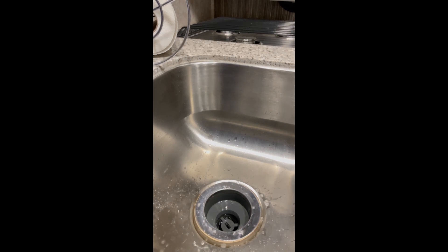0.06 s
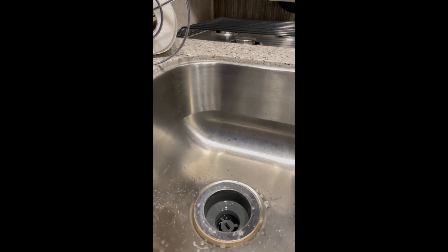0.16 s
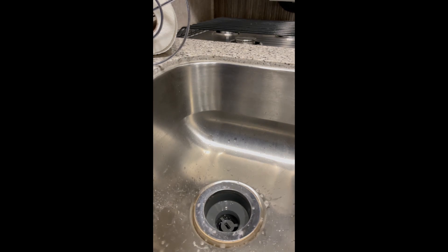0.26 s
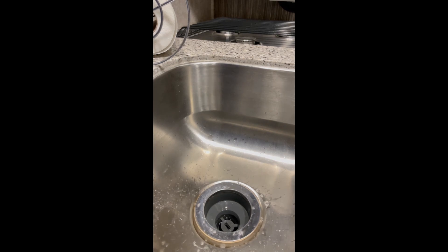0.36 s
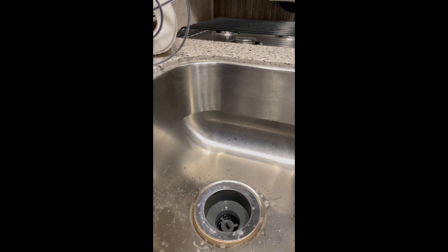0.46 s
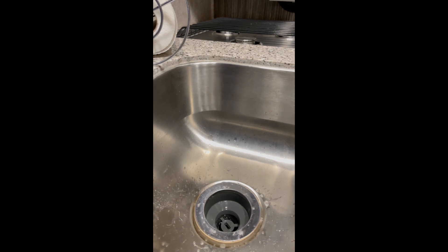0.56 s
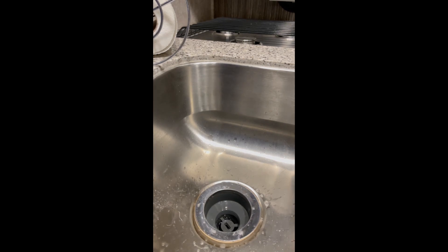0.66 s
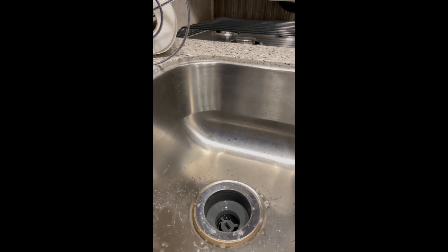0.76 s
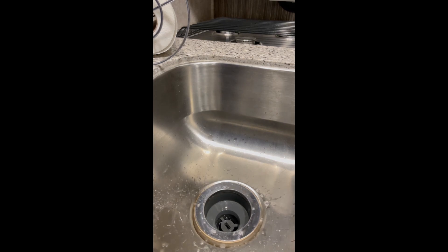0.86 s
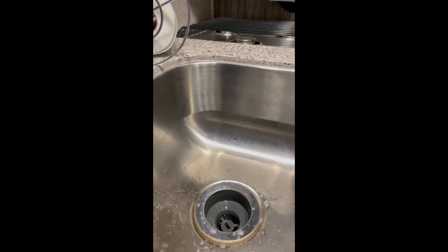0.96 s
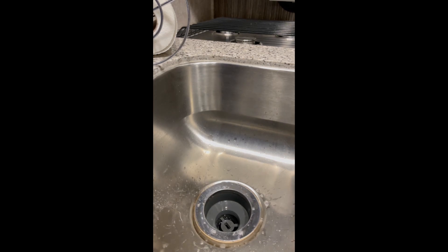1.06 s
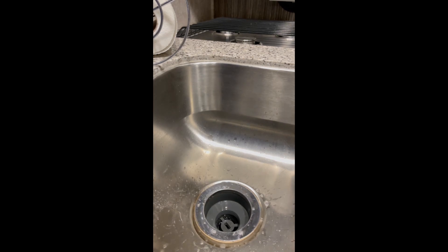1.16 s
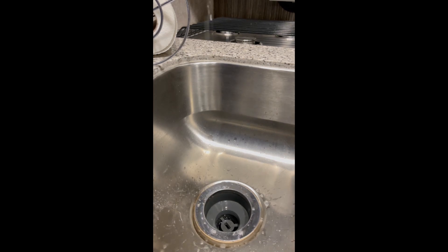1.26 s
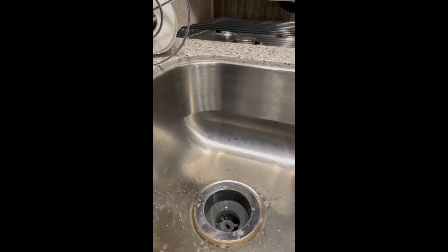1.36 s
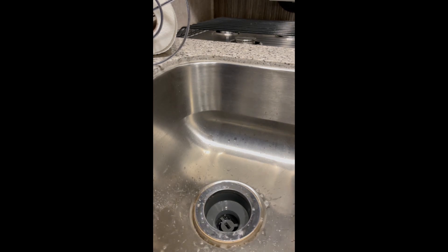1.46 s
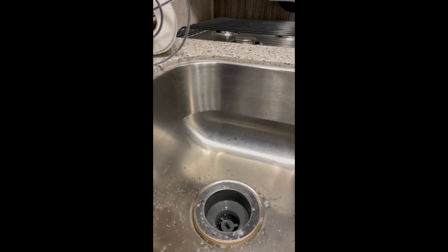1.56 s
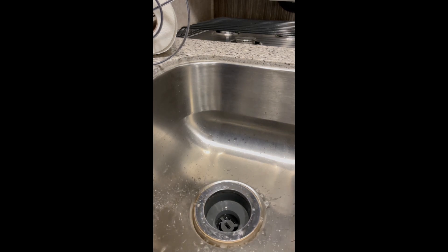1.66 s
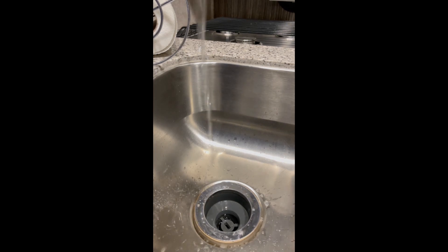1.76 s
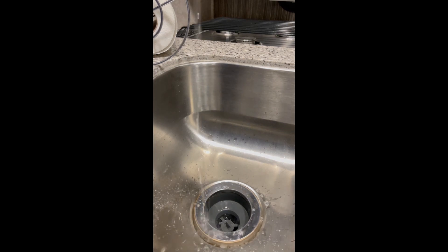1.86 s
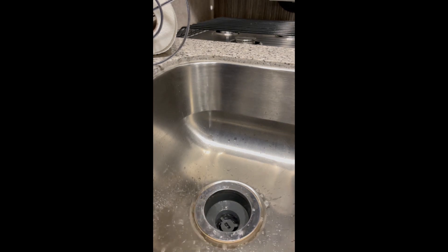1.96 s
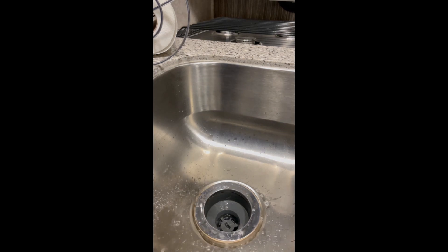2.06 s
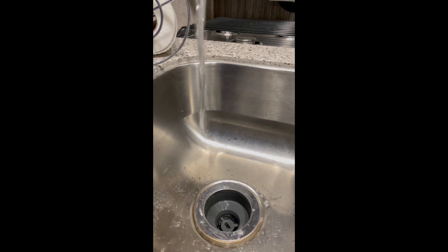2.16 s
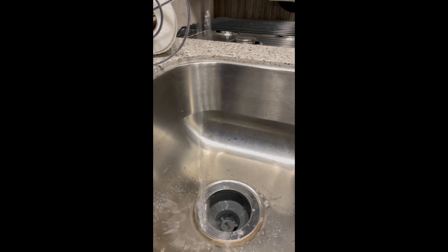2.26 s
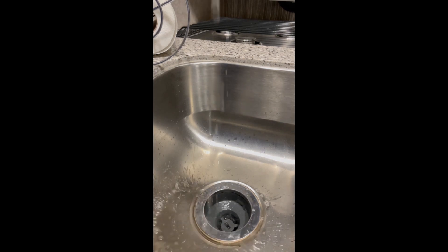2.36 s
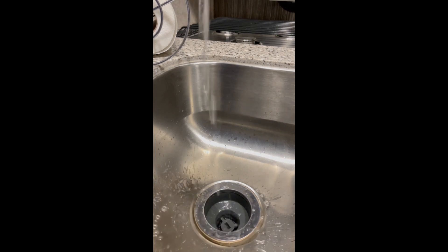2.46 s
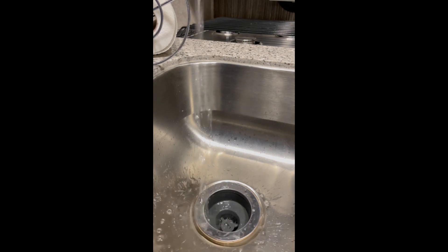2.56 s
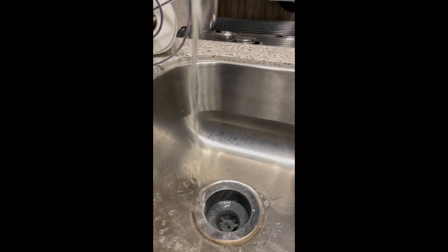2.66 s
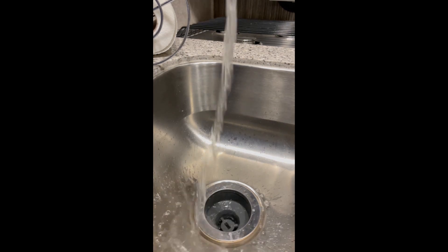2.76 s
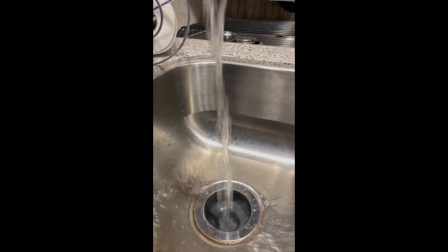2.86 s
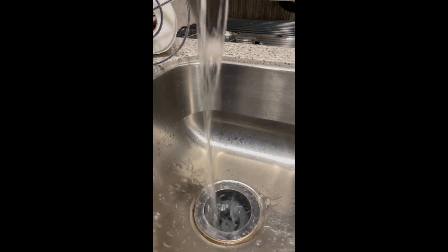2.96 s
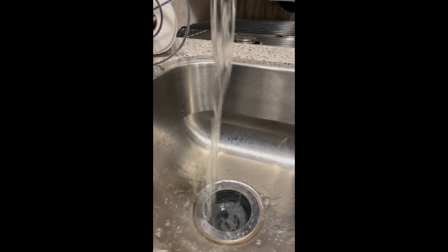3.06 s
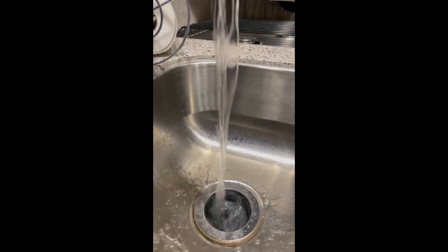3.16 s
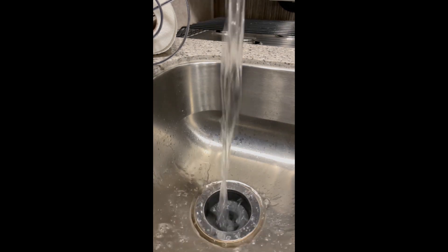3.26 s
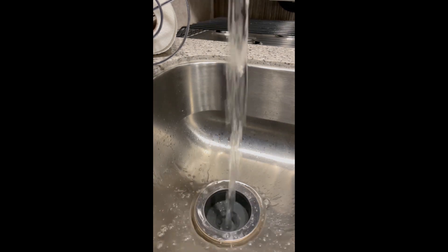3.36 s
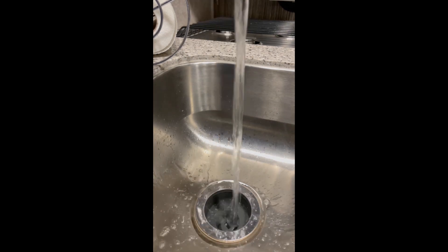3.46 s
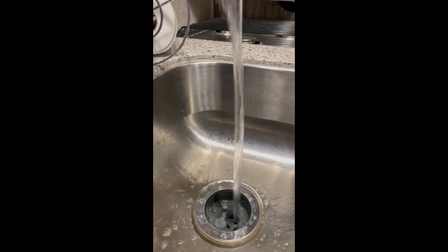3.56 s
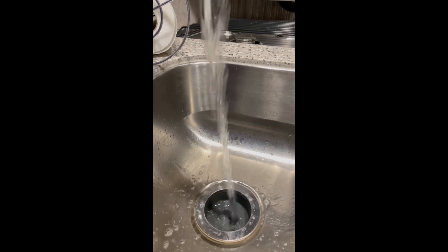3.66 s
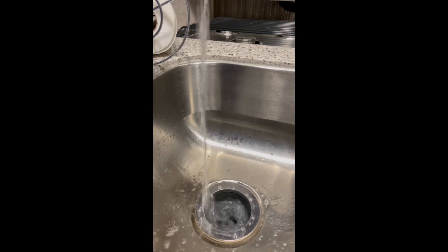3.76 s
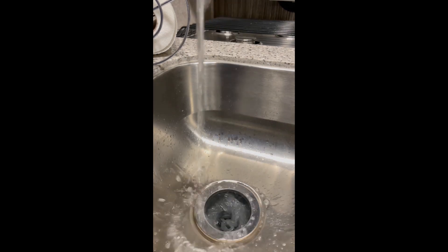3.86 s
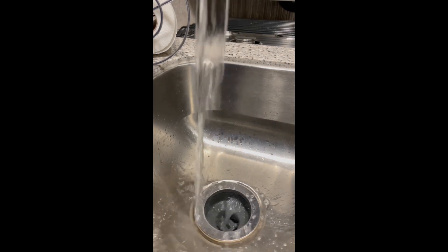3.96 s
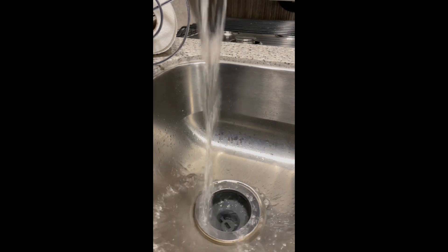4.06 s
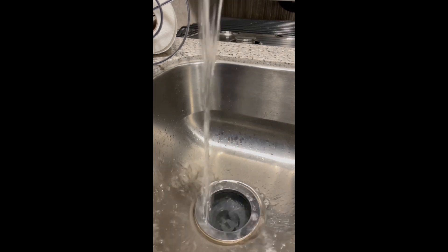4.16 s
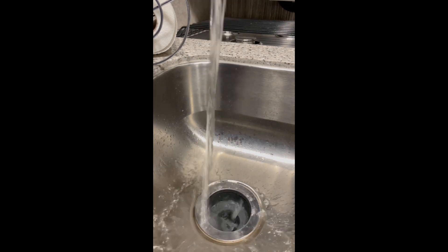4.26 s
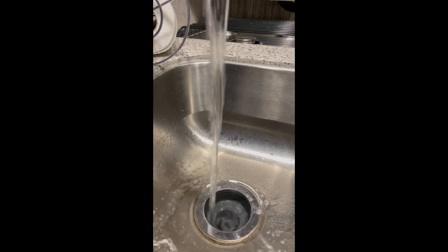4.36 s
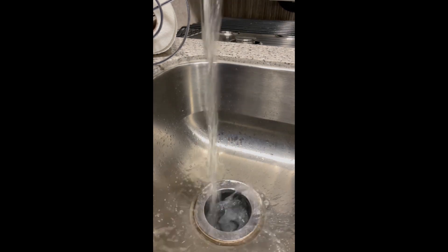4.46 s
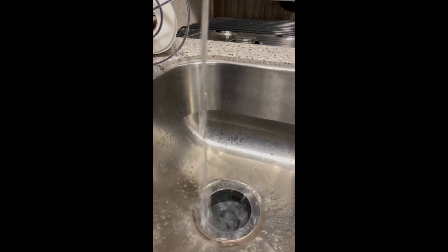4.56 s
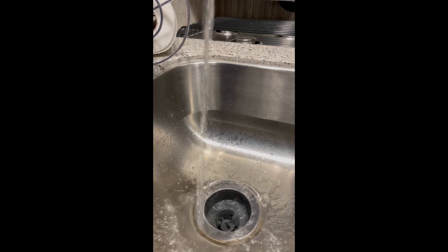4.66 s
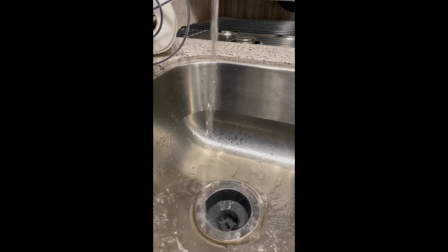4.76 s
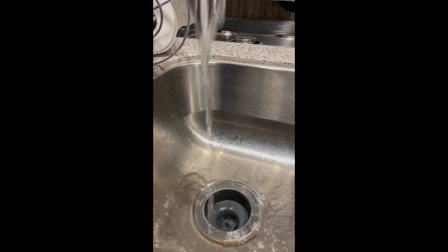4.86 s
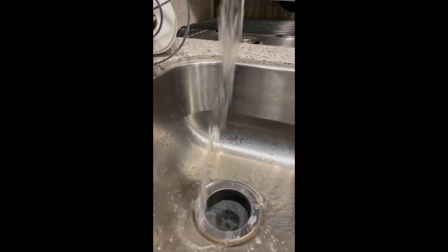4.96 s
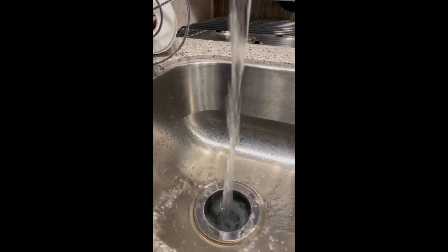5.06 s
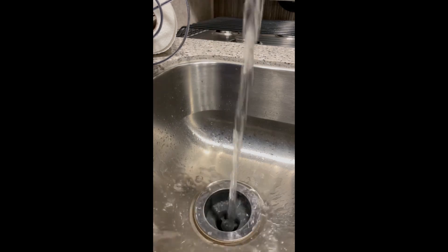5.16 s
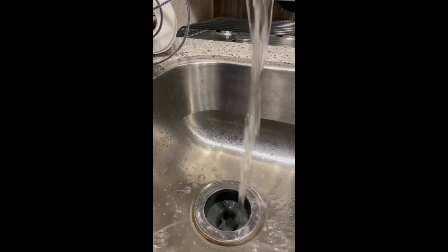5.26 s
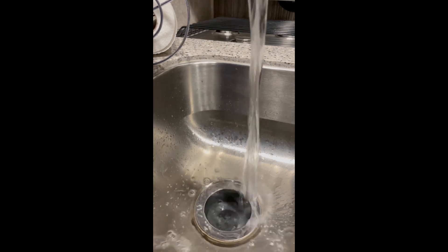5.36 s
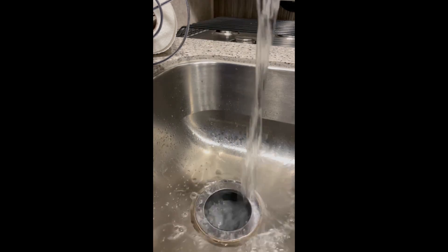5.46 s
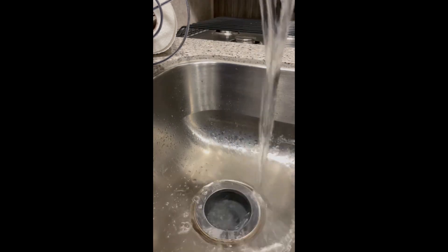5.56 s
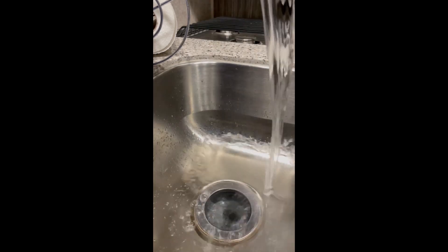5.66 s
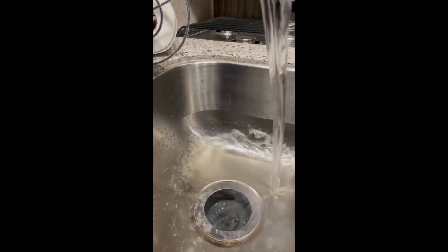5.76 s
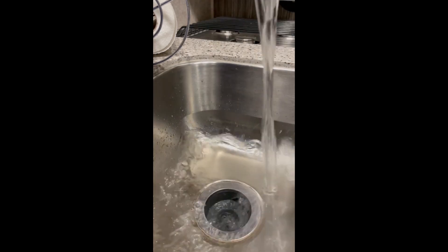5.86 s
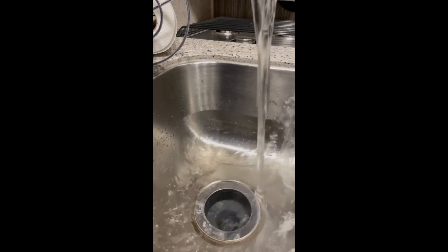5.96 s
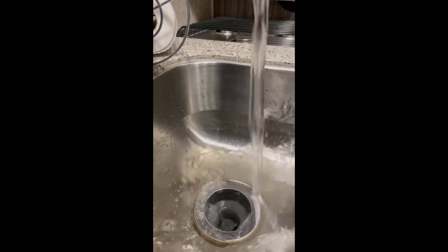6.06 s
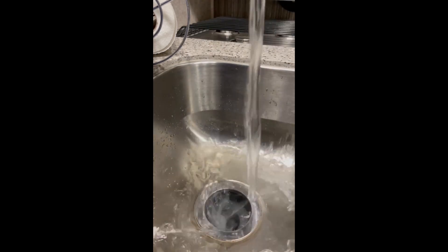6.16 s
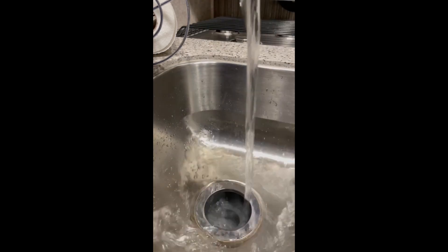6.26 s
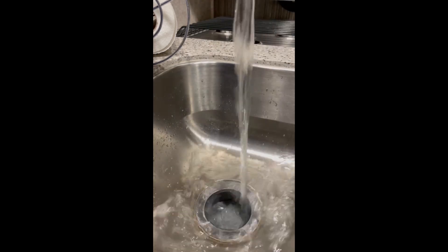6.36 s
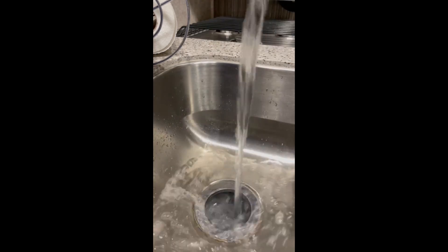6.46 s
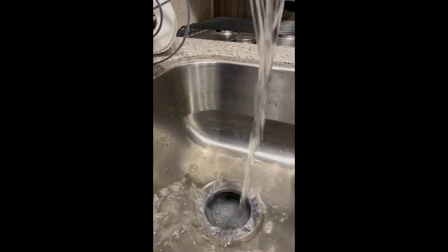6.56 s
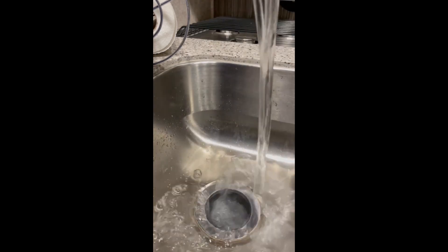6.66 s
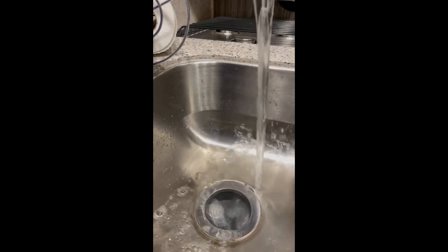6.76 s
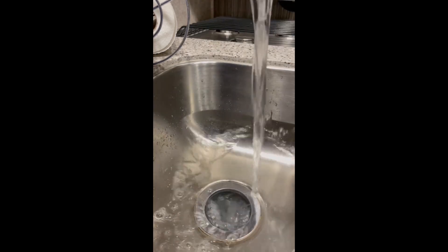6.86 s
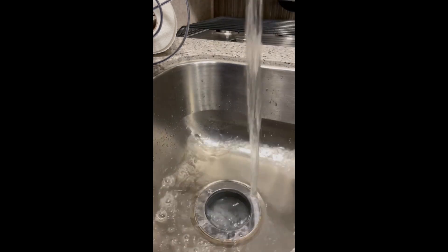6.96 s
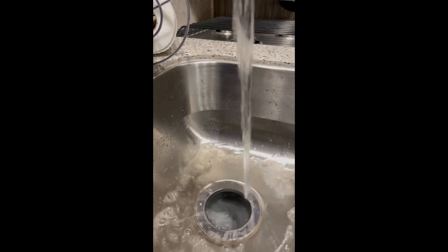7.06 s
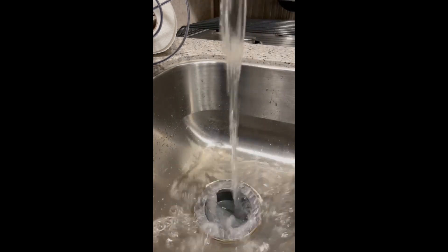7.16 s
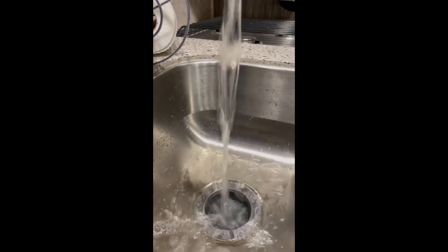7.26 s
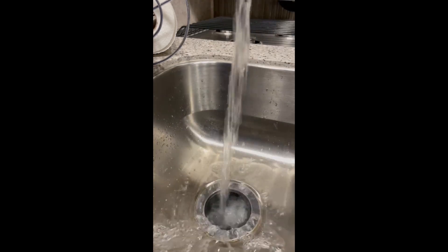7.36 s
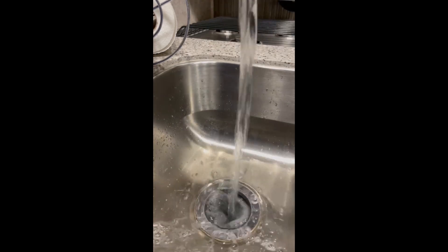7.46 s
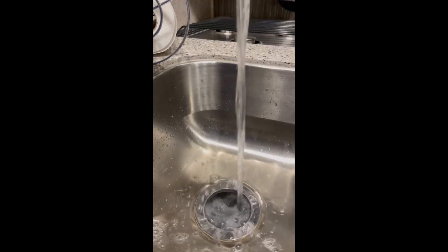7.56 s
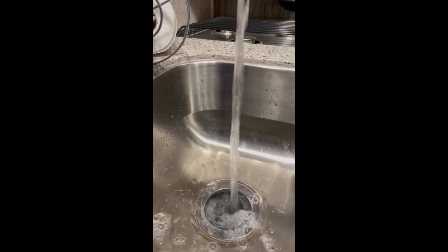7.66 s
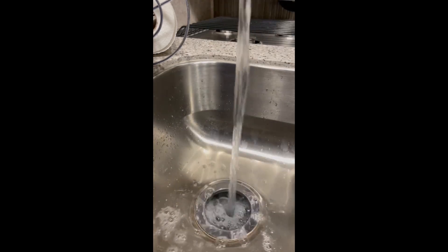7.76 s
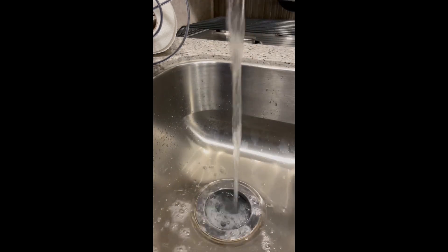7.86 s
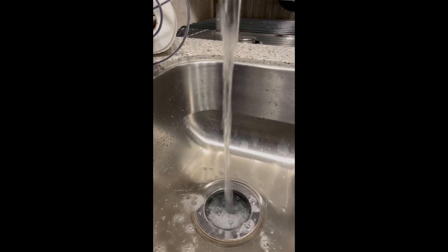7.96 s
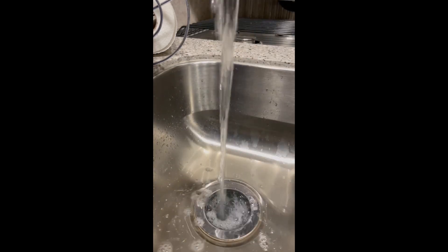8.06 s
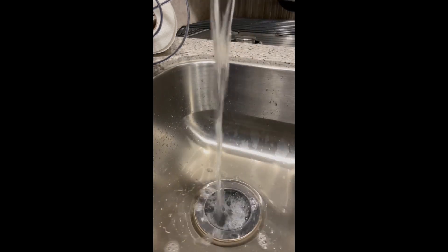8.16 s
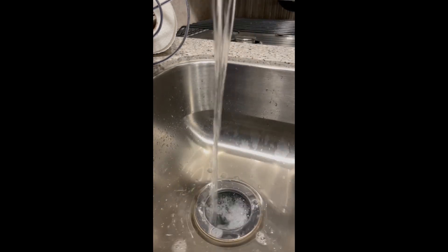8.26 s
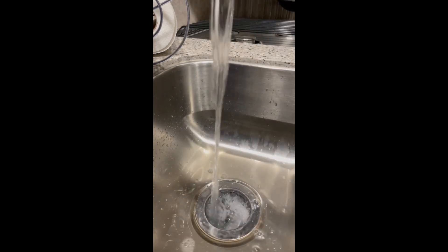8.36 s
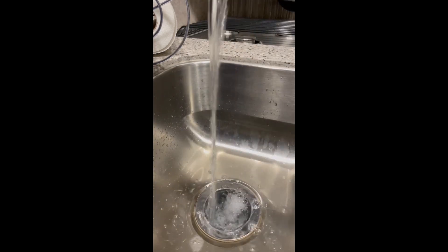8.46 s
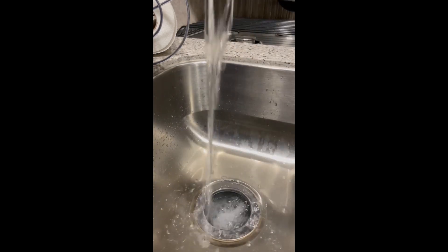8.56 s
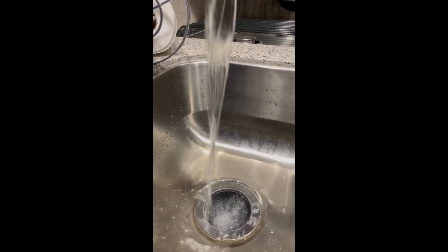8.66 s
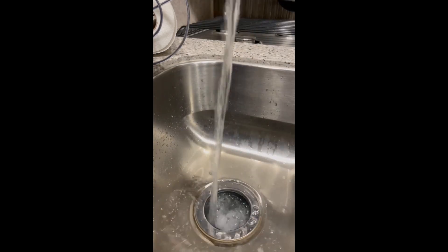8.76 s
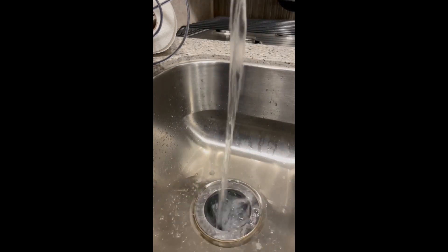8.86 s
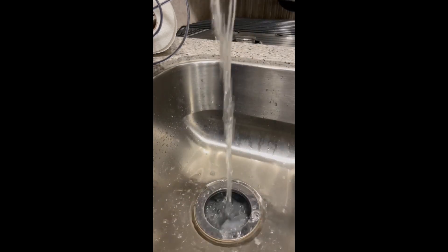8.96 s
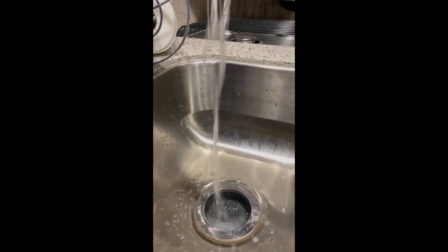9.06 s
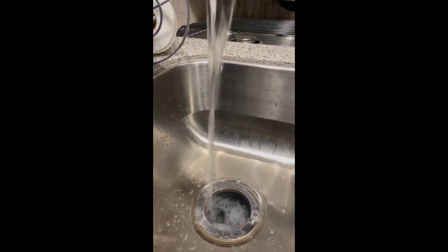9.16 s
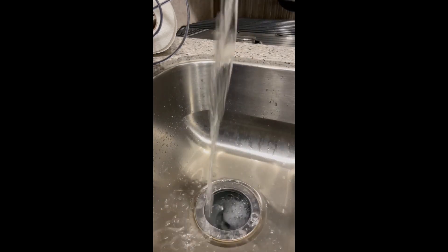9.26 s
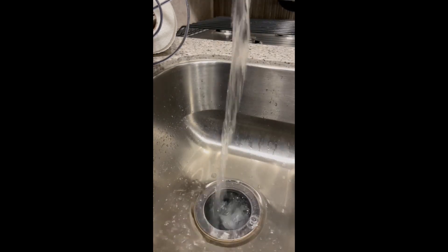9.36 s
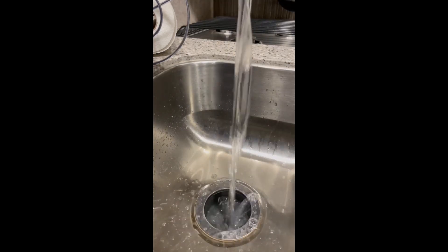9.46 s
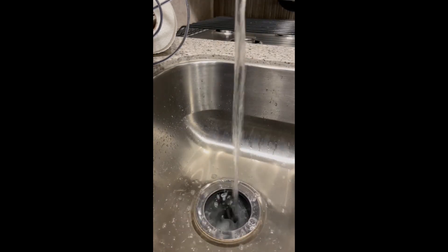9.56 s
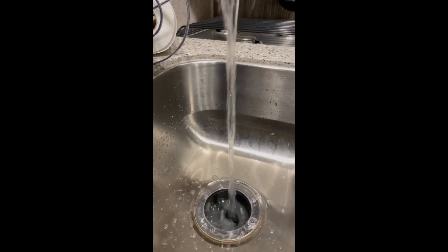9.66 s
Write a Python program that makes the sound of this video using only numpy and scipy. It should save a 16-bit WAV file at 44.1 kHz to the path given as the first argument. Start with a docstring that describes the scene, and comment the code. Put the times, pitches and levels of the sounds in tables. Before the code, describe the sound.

Water poured from a jug lands in a steel kitchen sink, first as separate splats, then as a wandering stream with a low hollow drumming and fizzy splashing. Bubbles and plops build up in the drain while the pour continues. Just before the water, two muffled wooden knocks are heard. The microphone is close above the basin, with a very faint fridge hum behind.

```python
"""Water pours from a jug into a steel kitchen sink: first spills, then a wandering stream.
The stream breaks into lumps whose impacts drive the modes of the bowl and throw spray. Trapped air
resonates as bubbles, which burble at the drain and glug in its pipe. Before the pour, two dull knocks
and a faint third ring a wooden cupboard. A phone with two spaced microphone ports listens from
above, over room tone and a faint fridge hum."""
import sys
import numpy as np
from scipy import signal
from scipy.fft import rfft, irfft, next_fast_len
from scipy.io import wavfile
from scipy.ndimage import uniform_filter1d, map_coordinates

SR = 44100
rng = np.random.default_rng(int(sys.argv[2]) if len(sys.argv) > 2 else 0)


def waveform_to_disk(signal):
    """Save audio, clipped to [-1, 1], as 16-bit WAV at the path in sys.argv[1]."""
    frames = np.transpose(np.atleast_2d(signal))
    scaled = np.clip(frames, -1, 1) * 32767
    samples = np.round(scaled).astype(np.int16)
    wavfile.write(sys.argv[1], SR, samples)


N = 428211


def stream():
    """Impact excitation: landing lumps drum the bowl, throw spray and trap air that resonates."""
    # Colour as the stream moves and the bowl fills: t/s, gurgle offset/dB, mist offset/dB,
    # pipe level/dB, then centre f/Hz of drum, froth and spray
    filling = [(1.4, 5.5, 3, -78, 175, 1900, 2300), (1.95, 0, 7.5, -60, 180.6, 1990, 2300),
               (2.3, 1, 6.5, -51, 180, 1510, 5500), (2.6, 4, -3.5, -42.5, 179, 1490, 5850),
               (3.0, 0.5, 1.5, -40, 160, 1240, 5000), (3.45, 6.5, 4.5, -47, 210, 1220, 3700),
               (3.62, 4.5, 3, -40, 199, 1650, 2860), (3.8, -2.5, 0, -35, 181, 1350, 4100),
               (4.1, 2, 6, -43.5, 167, 1460, 4830), (4.75, 2, -2.5, -41.5, 168.3, 1310, 4200),
               (5.2, 5.5, 1, -43, 174, 1180, 4100), (5.55, 2, 0.5, -42, 150, 1210, 4870),
               (5.8, 0.5, 0, -47.5, 160, 1680, 4900), (6.05, 1.5, -2, -43, 164.4, 1250, 4130),
               (6.6, 5, 7, -38.5, 164, 1130, 4020), (6.95, -4, 3, -44.5, 151, 1150, 3870),
               (7.25, 6, 1.5, -36.5, 168, 1460, 3230), (7.55, 5.5, -0.5, -39, 172, 1400, 3040),
               (7.9, 3, -3, -39.5, 176, 1410, 2770), (8.25, 4.5, 0.5, -39, 173, 1330, 4100),
               (8.65, -3.5, 2, -40.5, 182.5, 1380, 4100), (9.05, 6, 3, -36.5, 168, 1250, 4270),
               (9.71, -0.5, 2, -37, 187, 1290, 3800)]
    # Random drift of the gurgle, froth and spray centres: deviation/octaves
    wander = [0.26, 0.027, 0.15]
    drum_db, froth_db, spray_db = pour()
    gurgle_db, mist_db, pipe_db, drum_hz, froth_hz, spray_hz = curves(filling)
    on_steel_db = drum_db - froth_db  # high when the water hits steel rather than froth
    gurgle_db = gurgle_db - 7.5 + froth_db + 0.43 * on_steel_db
    mist_db = mist_db - 4 + spray_db + 0.29 * on_steel_db
    pipe_db = np.minimum(pipe_db, drum_db + 3)
    levels = np.array([drum_db, gurgle_db, froth_db, spray_db, mist_db, pipe_db])
    flutter_db = np.c_[[1.3, 2.6, 1.37, 0.97, 3.1, 2.2]] * wobble(per_s=14, count=6)  # independent
    surge_db = np.c_[[0.43, 1.3, 1.3, 0.73, 0.98, 0.2]] * wobble(per_s=12, count=1)  # shared
    drum_amp, gurgle_amp, froth_amp, spray_amp, mist_amp, pipe_amp = amp(levels + flutter_db + surge_db)
    drift = 2 ** (np.c_[wander] * wobble(per_s=7, count=3))
    hits = lumps(count=1400, spread_db=2.5)
    flares = unit(1.05 + unit(decay(decay(hits, t60=0.043), t60=0.004)))  # each lump flares the hiss
    drumming = drum_amp * drum(hits, drum_hz)
    wash = (gurgle_amp * gurgle(flares, 380 * drift[0])
            + froth_amp * froth(flares, froth_hz * drift[1])
            + spray_amp * spray(flares, spray_hz * drift[2]))
    return drumming + walls(wash) + mist_amp * mist(flares) + pipe_amp * pipe()


def pour():
    """Drum, froth and spray levels in dB: spills decay exponentially, then the stream sustains them."""
    # First spills from the jug: t/s, duration/s, drum level/dB, froth level/dB, spray level/dB
    spills = [(1.371, 0.017, -47.5, -60, -76), (1.859, 0.12, -34, -54, -60.5),
              (2.247, 0.11, -29.5, -51, -47.5)]
    # Continuous flow: t/s, drum level/dB, froth level/dB, spray level/dB
    flow = [(2.5, -46, -74, -54.5), (2.56, -35, -67, -64), (2.58, -36, -65, -35), (2.64, -33.5, -48, -49.5),
            (2.82, -23, -52.5, -47.5), (2.845, -28, -59, -38), (2.865, -25, -55, -34),
            (2.9, -24, -46.5, -36), (3.22, -33, -43.5, -38.5), (3.42, -29, -36, -34.5),
            (3.68, -35.5, -36.5, -38), (3.76, -31, -38, -29), (3.94, -31.5, -55.5, -54.5),
            (4.13, -33.5, -46, -37.5), (4.24, -26, -53.5, -44.5), (4.39, -45, -37.5, -33),
            (4.47, -22.5, -41.5, -41), (4.53, -36, -42.5, -30.5), (4.61, -29.5, -48, -43),
            (4.67, -28, -45, -33), (4.69, -22.5, -52, -48), (4.77, -27, -54, -55), (4.81, -29.5, -50, -45),
            (4.89, -39, -58.5, -49), (5.07, -33, -44.5, -32.5), (5.12, -31.5, -40, -36.5),
            (5.22, -35, -35, -34.5), (5.245, -34, -47, -40), (5.29, -27, -41, -32),
            (5.35, -34.5, -40.5, -29.5), (5.41, -26, -40.5, -30), (5.5, -29.5, -37, -30.5),
            (5.57, -34, -37, -32.5), (5.65, -43, -41, -35.5), (5.735, -38, -46.5, -40.5),
            (5.8, -36.5, -48.5, -33), (5.96, -37, -41, -31), (6.0, -34.5, -39, -30),
            (6.23, -33.5, -33.5, -28), (6.38, -38, -34.5, -31.5), (6.46, -38, -36.5, -39.5),
            (6.55, -43, -36, -38.5), (6.61, -41.5, -35, -32), (6.7, -40, -36, -36.5),
            (7.04, -37, -37, -35.5), (7.1, -36.5, -32, -28.5), (7.17, -37.5, -34.5, -35.5),
            (7.3, -39.5, -35, -36.5), (7.47, -41, -35.5, -32), (7.62, -34.5, -42, -36.5),
            (7.74, -39, -37.5, -38.5), (8.14, -34, -38.5, -40.5), (8.27, -31, -34, -35.5),
            (8.38, -36, -36.5, -35), (8.43, -34.5, -35.5, -36), (8.55, -36.5, -34.5, -35),
            (8.6, -37, -41, -39), (8.7, -35, -38, -40.5), (8.82, -35, -35, -39), (8.88, -35, -43, -42),
            (8.92, -35, -35.5, -38.5), (9.23, -28.5, -39.5, -40.5), (9.33, -37, -42.5, -36.5),
            (9.47, -27, -32.5, -34.5), (9.61, -34.5, -39.5, -33), (9.71, -26.5, -29.5, -30.5)]
    attack_s, t60_s = 0.02, np.c_[[0.5, 0.32, 0.43]]
    t = np.arange(N) / SR
    levels = curves(flow) - 60 * np.maximum(flow[0][0] - t, 0) / attack_s
    for start, length, *db in spills:
        attack_db = 60 * np.maximum(start - t, 0) / attack_s
        fall_db = 60 * np.maximum(t - start - length, 0) / t60_s
        levels = np.maximum(levels, np.c_[db] - attack_db - fall_db)
    return np.maximum(levels, -120)


def lumps(count, spread_db):
    """Jet break-up: each lump of water lands as one impulse, at a random time."""
    when, strength = rng.random((count, 2)).T
    return np.bincount((when * N).astype(int), amp(-spread_db * np.log(strength + .02)), N)


def drum(hits, centre_hz):
    """Forced vibration: impulses and noise drive the floor of the bowl."""
    force = 0.57 * unit(hits - hits.mean()) + rng.standard_normal(N)
    return moving_band(unit(bowl(force)), centre_hz, gain_db=13.5, octaves=0.14)


def bowl(force):
    """Modal superposition: the steel floor responds in low modes of alternating sign."""
    # Floor modes: f/Hz, bandwidth/Hz, gain/dB
    modes = [(118, 16.6, -11), (140, 12.6, -5), (156.6, 9.3, 1), (185.4, 11.8, -3.5), (211.3, 13.3, -5.5),
             (240, 14, -7.5), (297.3, 20, -13.5), (336.6, 19.4, -11), (449, 36, -16.5), (502.5, 12.4, -18)]
    return filtered(force, lambda f: sum((-1) ** k * resonance(f, *m) for k, m in enumerate(modes)))


def walls(x):
    """Sympathetic resonance: the thin walls, strainer and drain air add their ring to the water."""
    # Resonances: f/Hz, bandwidth/Hz, gain/dB relative to the direct sound
    modes = [(560, 14, -9), (760, 15, -9), (885, 21, 3.5), (1066, 15, 0.5), (1165, 24, 0), (1434, 33, -1.5),
             (1652, 28, -3), (1798, 17, 4), (2630, 17, -0.5), (2880, 108, 1), (3860, 43, -12),
             (3960, 84, -11), (5070, 690, -9.5), (6240, 220, -4)]
    return filtered(x, lambda f: amp(-1) * (1 + sum(resonance(f, *m) for m in modes)))


def gurgle(flares, dip_hz):
    """Resonance of large bubbles: a low swarm in noise, with a shallow moving dip in its spectrum."""
    # Gurgle spectrum: f/Hz, gain/dB
    spectrum = [(200, -6), (300, -1.5), (370, -6.5), (450, -9), (570, -6), (700, -10.5), (820, -17.5),
                (1100, -18.5)]
    noise = flares * patchy(2, size=(2, 12))
    large = swarm(count=1200, band_hz=(280, 850), spread_db=2, cycles=2.5, rise=.15, size=1000)
    return moving_band(coloured(noise + .3 * large, spectrum), dip_hz, gain_db=-3.0, octaves=0.78)


def froth(flares, centre_hz):
    """Resonance of mid-sized bubbles: many burble at the drain, and a few ring longer as clear plops."""
    # Froth spectrum: f/Hz, gain/dB
    spectrum = [(700, -7), (950, -4), (1200, -3.5), (1800, -4), (2050, -3), (2600, 5.5)]
    noise = flares * patchy(1.5, size=(3, 8))
    burble = swarm(count=4000, band_hz=(945, 2186), spread_db=2.5, cycles=3.33, rise=.12, size=600)
    plops = swarm(count=700, band_hz=(851, 2602), spread_db=2.5, cycles=5.5, rise=.06, size=900)
    foam = coloured(noise + .5 * burble + 0.25 * plops, spectrum)
    return moving_band(foam, centre_hz, gain_db=7.0, octaves=0.8)


def spray(flares, centre_hz):
    """Incoherent summation: small bubbles merge into a fizz; the flooded strainer lifts two bands."""
    # Spray spectrum: f/Hz, gain/dB
    spectrum = [(1200, -37), (2000, 0), (2400, 1.5), (2900, -4), (3400, -1.5), (3900, -1), (4500, -2.5),
                (5300, -9.5), (7000, 0.5), (9000, 3.5), (12000, -121)]
    # Strainer bands: f/Hz, bandwidth/Hz, gain/dB
    bands = [(2830, 270, -4), (5390, 600, 2)]
    # Strainer sizzle: t/s, level/dB relative to the spray
    sizzle_db = [(6.6, -15), (7.2, -8), (7.8, -9), (8.3, -10), (9.1, -8), (9.71, -19)]
    noise = flares * patchy(3.5, size=(5, 6))
    small = swarm(count=10000, band_hz=(2215, 9350), spread_db=3.5, cycles=7.5, rise=0.095, size=170)
    fizz = noise + .5 * small
    sizzle = filtered(fizz, lambda f: sum(amp(db) * lorentzian(f, hz, width) for hz, width, db in bands))
    hiss = moving_band(coloured(fizz, spectrum), centre_hz, gain_db=11.0, octaves=0.89)
    return hiss + amp(curves(sizzle_db)[0]) * unit(sizzle)


def mist(flares):
    """Resonance of the smallest bubbles: they ring highest and briefest, as a fine crackle."""
    # Mist spectrum: f/Hz, gain/dB
    spectrum = [(6500, 2.5), (9000, 1.5), (10500, -1.5), (12500, 6), (14000, -2.5), (15500, -3)]
    noise = flares * patchy(4.4, size=(8, 4))
    tiny = swarm(count=9000, band_hz=(6750, 15500), spread_db=5.0, cycles=8.6, rise=0.04, size=70)
    return coloured(noise + 0.73 * tiny, spectrum)


def pipe():
    """Low-frequency random noise: the waste pipe rumbles."""
    # Rumble spectrum: f/Hz, gain/dB
    spectrum = [(34, -23), (55, -11), (78, 1.5), (100, -3.5), (140, -0.5)]
    return coloured(patchy(1.5, size=(2, 20)), spectrum)


def splats():
    """Drop impact: a large lump cracks, hisses around its own pitch, traps a bubble and pushes the bowl."""
    # Single lumps: t/s, relative splash level/dB, splash centre f/Hz, relative push level/dB
    landings = [(1.3715, -43, 2000, -29), (1.372, -58, 7000, -62), (1.399, -43, 2100, -31),
                (1.4, -48, 7400, -64), (1.8493, -32.5, 6700, -42), (1.868, -27, 6700, -52),
                (1.867, -24.5, 2180, -39), (1.889, -31, 1900, -40), (1.925, -34, 2080, -21),
                (1.9937, -30.5, 2170, -32), (2.038, -30, 5100, -50), (2.041, -22, 6260, -33),
                (2.134, -51, 6500, -60), (2.15, -56, 6600, -60), (2.2369, -28, 2075, -21),
                (2.252, -29, 2300, -40), (2.279, -28, 5200, -45), (2.345, -30, 3000, -45),
                (2.389, -38, 6110, -34), (2.4085, -24, 6500, -41), (2.449, -32, 5000, -45),
                (2.456, -19, 5130, -48), (2.53, -38, 7000, -45), (2.569, -32, 3500, -50),
                (2.577, -17, 5000, -43), (2.583, -15, 3200, -45), (2.586, -7.5, 6350, -39),
                (2.61, -26, 6800, -43), (2.6373, -19.5, 2400, -18), (2.668, -13.5, 5520, -39),
                (2.7042, -22, 2500, -35), (2.749, -22.5, 2000, -39), (2.76, -25, 2600, -39),
                (2.792, -24, 7650, -37), (2.825, -28, 2400, -40), (2.838, -29, 7400, -40),
                (2.853, -10.5, 6740, -25), (2.886, -16, 3170, -40), (2.953, -17, 4000, -28),
                (2.994, -8.5, 7640, -30), (3.041, -19, 5100, -30), (3.0771, -14, 6730, -30),
                (3.1031, -18.5, 1840, -16), (3.125, -7.5, 7440, -17), (3.134, -10.5, 5100, -37),
                (3.159, -19, 1490, -30), (3.199, -36, 5100, -18), (3.2268, -14, 6700, -31),
                (3.292, -6, 8300, -30), (3.427, -12.5, 2680, -33), (3.455, -18, 2580, -35),
                (3.5423, -23, 1820, -19), (3.5873, -16, 2200, -35), (3.6108, -15.5, 1790, -20),
                (3.742, -19, 2920, -26), (3.781, -13, 6430, -28), (3.7912, -19, 3050, -30),
                (3.808, -17, 3020, -28), (3.903, -30, 3660, -39), (3.926, -13.5, 8300, -21.5),
                (3.979, -30, 6540, -22), (4.067, -24.5, 1460, -33), (4.089, -24, 6220, -25),
                (4.101, -19, 2960, -30), (4.1734, -18.5, 3160, -27), (4.277, -29, 2260, -30),
                (4.169, -19, 6500, -46), (4.3385, -13, 3160, -22), (4.377, -19, 2940, -19),
                (4.4344, -20, 1070, -26), (4.481, -22, 2240, -30), (4.506, -9.5, 4500, -14),
                (4.605, -30, 6500, -38), (4.6369, -17, 7090, -20), (4.6603, -16, 4820, -16.5),
                (4.706, -21, 7010, -37), (4.742, -28, 2340, -23), (4.805, -19, 2450, -38),
                (4.8535, -18, 7700, -39), (4.9196, -16.5, 6600, -46), (4.954, -26, 2940, -25),
                (5.01, -16, 5650, -39), (5.0377, -23, 2680, -32), (5.15, -17, 3020, -23.5),
                (5.172, -13.5, 2870, -17.5), (5.2537, -14.5, 5400, -28), (5.324, -11, 3000, -19),
                (5.5443, -11.5, 5350, -23), (5.6349, -20, 4240, -38), (5.6643, -17, 3650, -37),
                (5.744, -22, 5170, -24), (5.7849, -10, 6600, -20), (5.826, -17, 2420, -38),
                (5.947, -12, 6240, -35), (6.018, -11, 4000, -36), (6.054, -15, 2850, -38),
                (6.109, -4.5, 4340, -37), (6.219, -11, 3100, -35), (6.247, -15, 5400, -35),
                (6.347, -19, 5400, -40), (6.371, -11.5, 5830, -42), (6.486, -19, 2900, -32),
                (6.503, -13.5, 5150, -32), (6.521, -15.5, 5330, -29), (6.5343, -11, 2330, -26),
                (6.593, -11, 4140, -42), (6.621, -12, 2280, -30), (6.778, -12, 5600, -26),
                (6.801, -30, 3000, -30), (7.089, -10.5, 2470, -34), (7.1193, -12.5, 4780, -23),
                (7.4794, -16, 2860, -22), (7.608, -20, 2600, -25), (7.7822, -15, 1730, -49),
                (7.9272, -19, 2830, -37), (8.0167, -19, 2950, -38), (8.1792, -19, 2700, -22),
                (8.181, -17.5, 5470, -37), (8.22, -17.5, 5300, -40), (8.357, -18, 2800, -35),
                (8.462, -17, 1610, -27), (8.5322, -15, 5300, -29), (8.543, -13, 5270, -24),
                (8.6302, -22, 1540, -42), (8.6845, -26, 2400, -31), (8.727, -17.5, 1640, -38),
                (8.91, -12, 3840, -21), (9.202, -11.5, 4810, -33), (9.258, -15.5, 5200, -39),
                (9.307, -22, 5940, -38), (9.338, -16, 6240, -41), (9.4375, -14, 1600, -33),
                (9.438, -15, 5000, -40), (9.52, -15, 2970, -39), (9.651, -14, 3650, -33),
                (9.689, -15, 2920, -14)]
    width_hz, swell_s = 1540, 0.0035
    t = (np.arange(3072) - 1024) / SR
    f = np.fft.rfftfreq(len(t), 1 / SR)
    splashes, force = np.zeros(N + len(t)), np.zeros(N)
    age = np.maximum(t, 0)
    fade = (amp(-60 * age / 0.0087) + 0.14 * amp(-60 * age / 0.15)) * (1 - np.exp(-age / 0.00038))
    # A faint hiss swells for a few milliseconds before each splat, softening its attack
    fade += amp(-19) * np.exp(-abs(t) / swell_s)
    crack = amp(-11.5) * f / (f + 900) / (1 + (f / 9000) ** 4)
    for start, db, hz, push_db in landings:
        band = 1 / (1 + ((f / hz - hz / (f + 1)) * hz / width_hz) ** 2)
        puff = irfft(rfft(rng.standard_normal(len(t))) * (crack + band)) * fade
        puff *= np.linalg.norm(fade) / np.linalg.norm(puff)
        splashes[round((start + t[0]) * SR):][:len(t)] += amp(db - 6.5) * puff
        force[round(start * SR)] = amp(push_db + 44.5)
    start, db, hz, _ = np.transpose(landings)
    plinks = bubbles(start, hz, amp(db - 9), cycles=8.5, rise=0.076, size=800)
    return walls(splashes[:N] + plinks) + bowl(force)


def spits():
    """Short transients have wide spectra: a fine droplet bursts with a high snap and a tick of noise."""
    # Droplet bursts: t/s, relative level/dB
    bursts = [(1.85, -31), (2.2427, -53), (2.2617, -29), (2.279, -27), (2.295, -31), (2.345, -30),
              (2.416, -27), (2.456, -27), (2.638, -20.5), (2.704, -24.5), (2.758, -25), (2.7912, -17.5),
              (3.1247, -25), (3.225, -17.5), (3.303, -13), (3.435, -16.5), (3.4716, -27), (3.8346, -21),
              (3.858, -26), (4.0321, -27), (4.17, -19.5), (4.443, -22.5), (4.5066, -15), (4.548, -21),
              (4.562, -23), (4.608, -13), (4.638, -24), (4.661, -20), (4.694, -32), (4.745, -28),
              (4.776, -22), (4.805, -22), (4.853, -23), (4.868, -27), (4.956, -19.5), (5.356, -26),
              (5.7455, -17), (5.772, -19), (5.793, -16), (6.081, -22.5), (6.172, -16), (6.485, -28),
              (8.478, -24), (8.684, -25), (8.911, -22), (9.26, -22), (9.3057, -26), (9.539, -15),
              (9.5631, -26)]
    # Tick spectrum: f/Hz, gain/dB
    spectrum = [(5500, -18), (7500, 0.5), (9000, 2.5), (10500, 4), (12500, 1), (14000, -5), (15500, -6)]
    start, db = np.transpose(bursts)
    t = np.arange(1500) / SR
    impulses = np.bincount((start * SR).astype(int), amp(db), N)
    fade = amp(-60 * t / 0.012) * (1 - np.exp(-t / 0.00026))
    snap_hz = 12600 * 2 ** rng.normal(0, .08, len(start))
    snaps = bubbles(start, snap_hz, amp(db + 2), cycles=5, rise=0, size=120)
    ticks = np.convolve(impulses, fade)[:N] * coloured(rng.standard_normal(N), spectrum)
    return amp(-1.5) * ticks + snaps


def glugs():
    """Minnaert resonance: large bubbles close in the drain and ring with rising pitch."""
    # Large bubbles: t/s, relative level/dB, starting f/Hz
    closures = [(2.75, -18.5, 387), (3.158, -28, 300), (3.16, -23, 720), (3.389, -17, 620),
                (3.403, -5, 206), (3.439, -7.5, 220), (3.533, -23, 1055), (3.55, -13.5, 202),
                (3.588, -11, 2120), (3.6, -22, 770), (3.609, -14, 1610), (3.928, -20, 300),
                (4.365, -20, 1390), (4.4, -23, 1150), (4.805, -22, 312), (5.287, -14, 443),
                (5.454, -20, 1030), (5.52, -13.5, 1400), (5.561, -17.5, 1070), (5.691, -17.5, 1240),
                (5.775, -20, 1570), (5.826, -16, 2400), (5.83, -21, 1720), (5.845, -11, 2040),
                (5.908, -19.5, 1340), (5.96, -15, 2200), (5.986, -18, 1050), (6.006, -12.5, 1000),
                (6.019, -12, 947), (6.198, -16, 1010), (6.246, -10.5, 1445), (6.324, -19, 1160),
                (6.393, -17, 1160), (6.485, -19, 1050), (6.533, -10.5, 1380), (6.598, -20, 1300),
                (6.776, -16.5, 1140), (6.927, -23, 1320), (6.945, -15, 1070), (7.109, -11.5, 1234),
                (7.139, -22, 333), (7.164, -19, 1160), (7.187, -15, 1190), (7.305, -15.5, 72),
                (7.328, -15.5, 1130), (7.367, -18.5, 279), (7.743, -20, 560), (7.755, -20, 300),
                (7.781, -19, 1220), (7.911, -16, 560), (8.012, -23, 1130), (8.18, -19, 1110),
                (8.221, -10.5, 595), (8.257, -13, 1156), (8.276, -11, 1400), (8.32, -24, 1120),
                (8.362, -18, 1400), (8.409, -19, 575), (8.426, -19, 1500), (8.546, -14, 885),
                (8.629, -16, 1400), (8.726, -18, 1110), (8.774, -15.5, 1440), (8.887, -22, 1150),
                (8.908, -19, 1130), (9.057, -17, 1130), (9.091, -15, 1410), (9.124, -17, 484),
                (9.167, -13, 1037), (9.225, -15.5, 1100), (9.37, -14, 93), (9.39, -18, 466),
                (9.391, -17, 2200), (9.457, -19, 1520), (9.493, -18, 1120), (9.519, -18, 1440),
                (9.549, -19.5, 410), (9.684, -15, 1080), (9.686, -13, 290)]
    start, db, hz = np.transpose(closures)
    cycles = 3.47 * (hz / 600) ** 0.42  # higher bubbles last more cycles
    return bubbles(start, hz, amp(db - 5.0), cycles[:, None], rise=0.089, size=2400)


def gulps():
    """Pitch varies inversely with radius: an air pocket breaks into six bubbles that tend upwards."""
    # Air pockets: t/s, duration/s, level/dB, nominal first f/Hz, nominal last f/Hz
    pockets = [(5.069, 0.042, -30, 360, 640), (7.109, 0.046, -28.5, 287, 500), (7.222, 0.03, -22, 340, 564),
               (8.766, 0.086, -20.5, 1210, 1640), (9.007, 0.025, -28, 434, 1150)]
    start, length, db, first_hz, last_hz = np.transpose(pockets)[:, :, None]
    progress = np.linspace(0, 1, num=6) + 0.0996 * rng.standard_normal((len(pockets), 6))
    gain = amp(db + 1.6 * rng.standard_normal(progress.shape))
    hz = first_hz * (last_hz / first_hz) ** (progress + 0.207 * rng.standard_normal(progress.shape))
    times = start + length * progress
    return bubbles(times.ravel(), hz.ravel(), gain.ravel(), cycles=2.8, rise=0.06, size=2400)


def drain():
    """Air-column resonance: froth keeps the flooded drain droning."""
    # Drone: t/s, level/dB
    drone_db = [(5.0, -110), (6.9, -53.5), (7.3, -51), (7.6, -50), (7.8, -42), (8.0, -42), (8.15, -50),
                (8.24, -43), (8.45, -50), (8.7, -56), (9.1, -65), (9.71, -48)]
    air = filtered(patchy(3.4, size=(2, 14)), lambda f: lorentzian(f, hz=601, width_hz=55))
    return amp(curves(drone_db)[0] + 0.95 * wobble(per_s=7.4, count=1)[0]) * unit(air)


def knocks():
    """Damped free vibration: a dull blow rings the wooden cupboard and rattles what is in it."""
    # Blows: t/s, relative level/dB
    blows = [(0.033, -15.5), (.141, -21.5), (.255, -39)]
    # Cupboard modes: f/Hz, level/dB, T60/s
    modes = [(58.4, -12, 0.9), (99.6, 4.5, 0.12), (124.6, 0, 0.18), (190.2, -1, 0.24), (268, -9, 0.29),
             (348, -25, 0.11), (441, -14, 0.16), (660, -27, 0.17), (760, -45, 0.097)]
    out, t = np.zeros(N), np.arange(SR // 2) / SR
    late = np.maximum(t - 0.00393, 0)  # the panel answers just after the first touch
    ring = sum(-amp(db - 60 * late / t60) * np.sin(2 * np.pi * hz * late) for hz, db, t60 in modes)
    ring *= 1 - np.exp(-(late / 0.0024) ** 2)
    lowpass = lambda x, order, hz: unit(signal.sosfilt(signal.butter(order, hz, fs=SR, output="sos"), x))
    for start, db in blows:
        noise = rng.standard_normal((3, len(t)))
        clunk = amp(-22 - 60 * t / 0.051) * (1 - np.exp(-t / 0.00058)) * lowpass(noise[0], 4, 1600)
        boom = amp(-15 - 60 * t / 0.23) * (1 - np.exp(-t / 0.007)) * lowpass(noise[1], 2, 330)
        tick = amp(-31.5 - 60 * t / 0.016) * lowpass(noise[2], 2, 4500)
        out[round(start * SR):][:len(t)] += amp(db - 3.5) * (ring + tick + clunk + boom)
    return out


def ports(x):
    """Path difference and scattering: direct sound leads at one port; echoes from the bowl decorrelate."""
    # Sound at the two ports: f/Hz, coherence, left phase lead/rad, left minus right level/dB
    pair = [(40, .95, 0, .4), (80, .975, 0, .3), (120, .992, 0, .7), (250, 0.98, -0.1, 1.3),
            (500, 0.89, -0.4, 3.3), (800, 0.6, -0.9, 0.4), (1150, 0.79, -0.3, -5.8), (1600, 0.9, 0.0, -2.7),
            (2000, 0.72, 0.3, -0.8), (2400, 0.53, 1.0, 3.0), (2900, 0.46, 0.8, 2.2), (3500, 0.3, 2.0, 1.3),
            (4400, 0.31, 2.1, -0.5), (5300, 0.87, 6.3, 0.7), (7000, 0.68, 7.7, -0.6),
            (8500, 0.82, 9.1, -0.0), (10500, 0.96, 9.4, -0.1), (12500, 0.72, 10.8, 0.1),
            (14000, 0.85, 12.4, 0.1), (15500, 0.94, 12.6, -0.1)]
    t = np.arange(2000) / SR
    window = np.sqrt(signal.windows.hann(2 * len(t), sym=False))
    scatter = np.zeros(N)
    for at in range(0, N, len(t)):  # the landing point wanders, so the echoes keep changing
        reflections = unit(rng.standard_normal(len(t)) * amp(-60 * t / 0.065)) / np.sqrt(len(t))
        piece = x[at:at + len(window)]
        echo = signal.fftconvolve(piece * window[:len(piece)], reflections)
        scatter[at:at + len(echo)] += echo[:N - at]
    angle = lambda f: np.arccos(np.clip(along(pair, f), 0, 1)) / 2
    split = lambda f, column: np.outer([.5, -.5], along(pair, f, column))
    lean = lambda f: amp(split(f, 3)) * np.exp(1j * split(f, 2))
    direct = filtered(x, lambda f: lean(f) * np.cos(angle(f)))
    return direct + filtered(scatter, lambda f: lean(f) * np.sin(angle(f)) * [[1], [-1]])


def kitchen():
    """Partly coherent room noise, with the harmonic series of a fridge motor."""
    # Room tone: f/Hz, gain/dB
    spectrum = [(20, -24), (55, 4), (120, -3.5), (200, -12), (400, -17.5), (900, -21.5), (2000, -29.5),
                (2900, -36.5), (3300, -40), (4500, -41.5), (5300, -50.5), (12000, -49.5), (14000, -60),
                (14800, -79)]
    # Likeness of left and right: f/Hz, correlation (limited to -1..1 below)
    likeness = [(60, 0.99), (130, 0.93), (290, 0.46), (640, -0.52), (8000, 0.33), (9500, -2),
                (12000, -0.38), (14000, .5)]
    # Motor harmonics: f/Hz, rms level/dB
    harmonics = [(59.2, -82), (118.4, -69), (177.6, -73)]
    angle = lambda f: np.arccos(np.clip(along(likeness, f), -1, 1)) / 2
    response = lambda f: amp(along(spectrum, f)) * [np.cos(angle(f)), np.sin(angle(f))]
    mid, side = filtered(rng.standard_normal((2, N)), response)
    hum = sum(np.sqrt(2) * amp(db) * np.sin(2 * np.pi * hz * np.arange(N) / SR) for hz, db in harmonics)
    return amp(-57) * unit(np.array([mid + side, mid - side])) + hum


def bubbles(start, hz, gain, cycles, rise, size):
    """Damped oscillators near a surface: in `cycles` periods they fall to 1/e and sharpen by `rise`."""
    t = np.arange(size) / SR
    age = hz[:, None] * t / cycles
    tone = np.sin(2 * np.pi * hz[:, None] * t * (1 + rise * age / 2))
    tone *= np.exp(-age) * (1 - np.exp(-6 * age))
    tone *= gain[:, None] * np.hanning(2 * size)[size:]
    at = (start * SR).astype(int)[:, None] + np.arange(size)
    return np.bincount(at.ravel(), tone.ravel(), N + size)[:N]


def swarm(count, band_hz, spread_db, cycles, rise, size):
    """Superposition of bubbles at random times, pitches and strengths, rms 1."""
    when, pitch, strength = rng.random((count, 3)).T
    low, high = band_hz
    gain = amp(-spread_db * np.log(strength + .02))
    return unit(bubbles(when * N / SR, low * (high / low) ** pitch, gain, cycles, rise, size))


def patchy(depth_db, size):
    """Random modulation: noise whose gain drifts in patches of size (bins, frames), rms 1."""
    z = signal.stft(rng.standard_normal(N), nperseg=256)[2]
    field = uniform_filter1d(uniform_filter1d(rng.standard_normal(z.shape), size[0], 0), size[1], 1)
    return unit(signal.istft(z * amp(depth_db * unit(field)), nperseg=256)[1][:N])


def moving_band(x, centre_hz, gain_db, octaves):
    """Time-varying filter: a lift or dip follows a moving centre at unchanged mean power."""
    f, t, z = signal.stft(x, SR, nperseg=2048)
    centre = centre_hz[np.minimum(t * SR, N - 1).astype(int)]
    gain = amp(gain_db * np.exp(-(np.log2((f[:, None] + 1) / centre) / octaves) ** 2))
    power = np.mean(abs(z) ** 2, axis=1)
    return signal.istft(z * gain / np.sqrt(power @ gain ** 2 / power.sum()), SR, nperseg=2048)[1][:N]


def resonance(f, hz, width_hz, db):
    """Complex response of one damped mode."""
    return amp(db) * 1j * f * width_hz / (hz * hz - f * f + 1j * f * width_hz)


def lorentzian(f, hz, width_hz):
    """Resonance line shape of height 1."""
    return 1 / (1 + (2 * (f - hz) / width_hz) ** 2)


def filtered(x, response):
    """Linear filtering: the spectrum of x times a complex response."""
    m = next_fast_len(N + SR // 2, True)
    return irfft(rfft(x, m) * response(np.fft.rfftfreq(m, 1 / SR)), m)[..., :N]


def coloured(x, spectrum):
    """Spectral shaping by a table of gains, rms 1."""
    points = [(1, -120)] + spectrum + [(SR / 2, -120)]
    return unit(filtered(x, lambda f: amp(along(points, f))))


def decay(x, t60):
    """Exponential decay after each impulse."""
    return signal.lfilter([1], [1, -amp(-60 / (t60 * SR))], x)


def wobble(per_s, count):
    """Smooth random curves through per_s knots a second."""
    knots = rng.standard_normal((count, int(N * per_s / SR) + 4))
    return np.array([map_coordinates(k, [np.arange(N) * per_s / SR]) for k in knots])


def along(points, f, column=1):
    """One column of a table, interpolated over log frequency."""
    table = np.transpose(points)
    return np.interp(np.log(f + 1), np.log(table[0] + 1), table[column])


def curves(rows):
    """Each column after the time, interpolated to every sample."""
    times, *columns = np.transpose(rows)
    return np.array([np.interp(np.arange(N) / SR, times, c) for c in columns])


def amp(db):
    """Amplitude ratio of a level in dB."""
    return 10 ** (np.asarray(db) / 20)


def unit(x):
    """Normalisation to rms 1."""
    return x / np.sqrt(np.mean(x ** 2) + 1e-20)


def scene():
    """Superposition: water and knocks reach the two ports, over the sound of the room."""
    return ports(stream() + splats() + spits() + walls(glugs() + gulps()) + drain() + knocks()) + kitchen()


def record(dry):
    """Band limiting: the phone cuts off the highest treble along a raised-cosine edge."""
    cutoff_hz, edge_hz = 15750, 200
    return filtered(dry, lambda f: np.sin(np.pi / 2 * np.clip((cutoff_hz - f) / edge_hz + .5, 0, 1)) ** 2)


dry = scene()
out = record(dry)
waveform_to_disk(out)
```